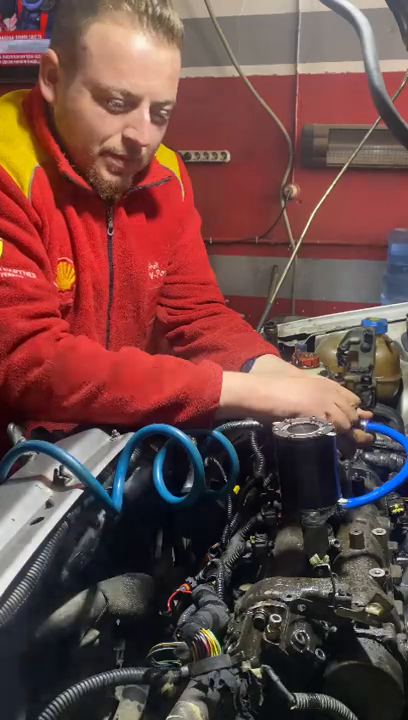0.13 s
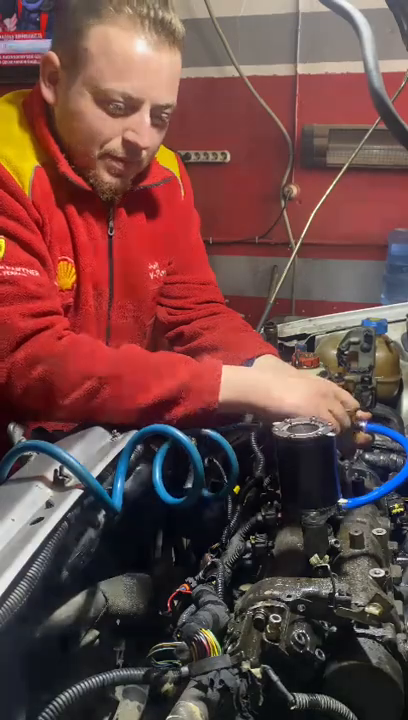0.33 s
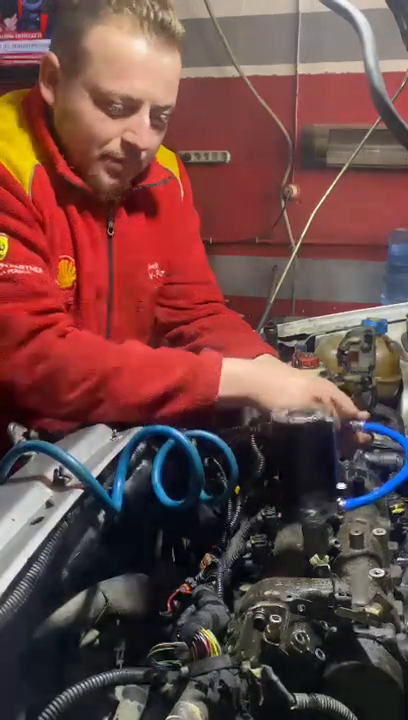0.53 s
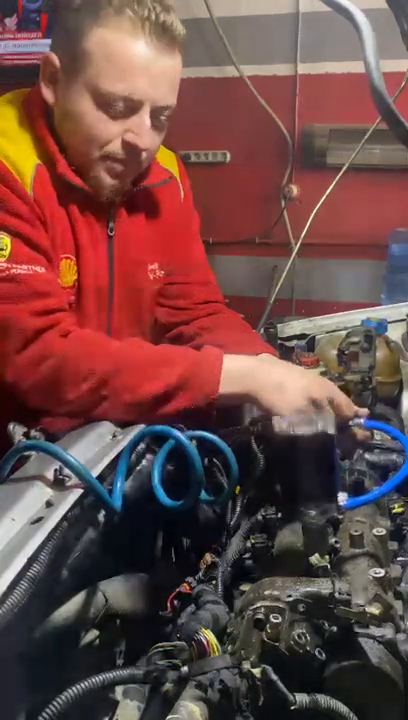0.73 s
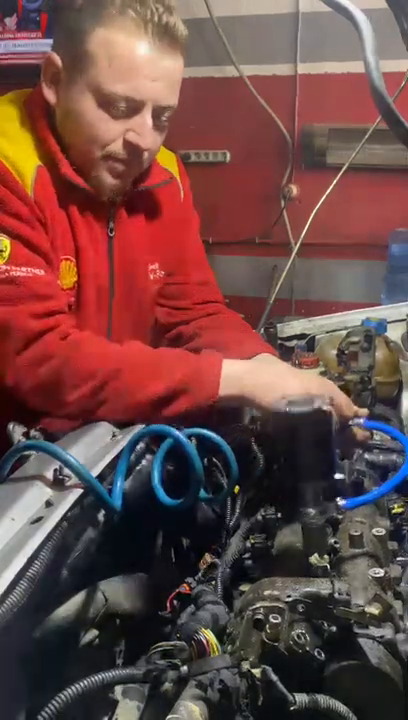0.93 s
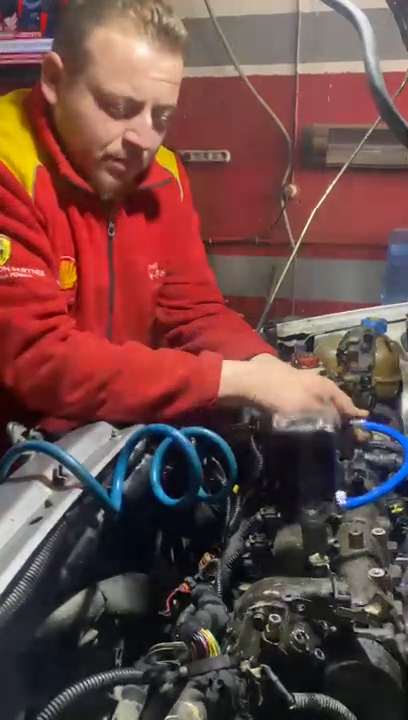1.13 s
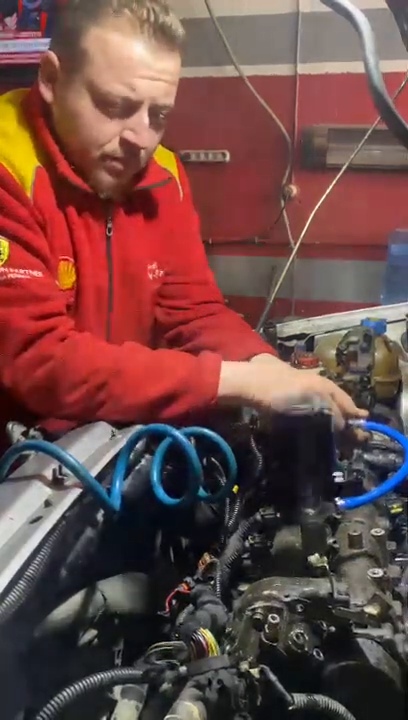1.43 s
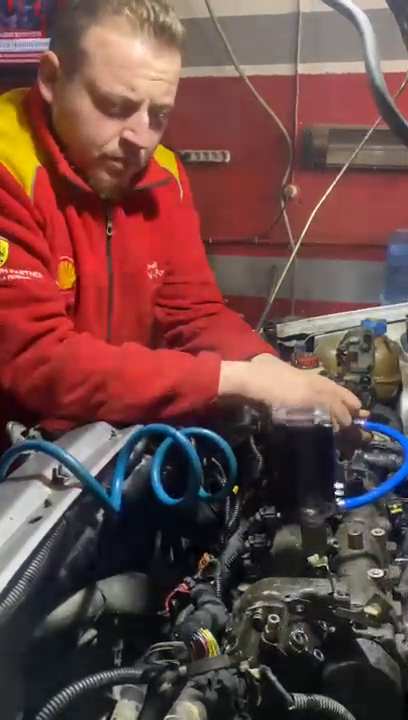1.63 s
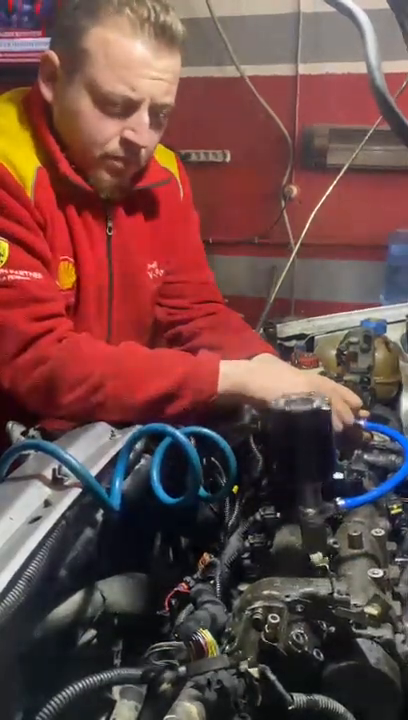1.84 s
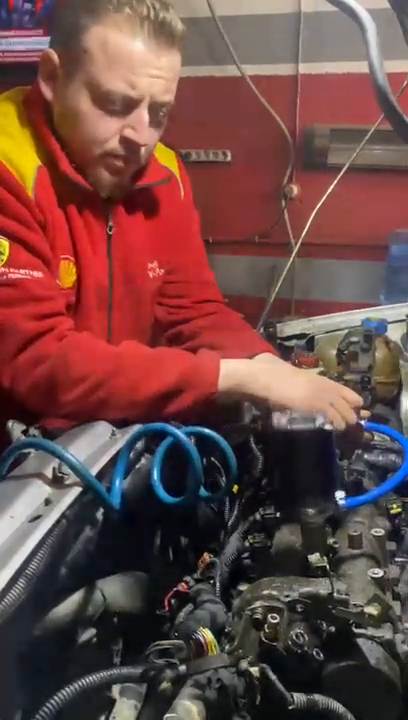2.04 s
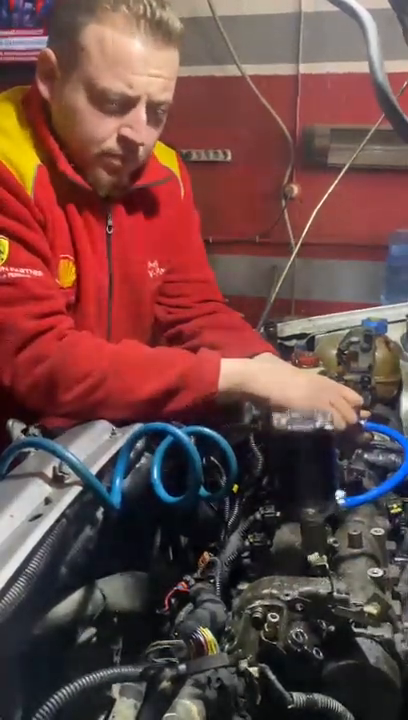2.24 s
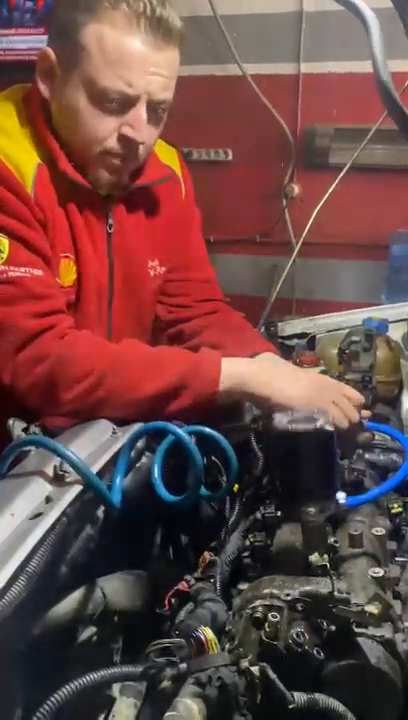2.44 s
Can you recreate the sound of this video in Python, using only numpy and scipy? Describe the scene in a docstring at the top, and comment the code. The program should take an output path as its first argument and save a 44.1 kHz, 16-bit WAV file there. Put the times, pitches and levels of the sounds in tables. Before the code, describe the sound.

Air hisses, then an air hammer pounds fast on engine metal in a workshop.

```python
"""Air hisses over a low motor hum as a valve opens, then a hand-held pneumatic hammer rattles on an engine.
The piston shuttles about 16 times a second: a bright steel strike going down, a duller knock coming back.
Exhaust air keeps hissing and puffs with each stroke.
The workshop walls answer the blows with a short reverberation."""
import sys
import numpy as np
from scipy import signal
from scipy.fft import rfft, irfft
from scipy.io import wavfile
from scipy.ndimage import uniform_filter1d

SR = 44100
rng = np.random.default_rng(int(sys.argv[2]) if len(sys.argv) > 2 else 0)


def to_wav(s):
    """Save 16-bit WAV."""
    ch = np.atleast_2d(s).T  # columns
    pcm = np.round(np.clip(ch, -1, 1) * 32767)  # PCM
    wavfile.write(sys.argv[1], SR, pcm.astype(np.int16))


N = 114660

# Motor hum. Each row: frequency in Hz, relative level in dB.
HUM_LINES = [(53, -44.5), (70, -37.5), (111, -40.5)]
# Envelopes. Each row: time in seconds, gain in dB.
BACKGROUND_GAIN = [(.6, -1), (.78, -13.5)]
DULL_RUMBLE_GAIN = [(.12, -41.5), (.55, -47)]
VALVE_GAIN = [(.17, -80), (.215, -37.5), (.275, -24.5), (.33, -27.5), (.47, -29.5), (.52, -20.5),
              (.57, -15), (.595, -21.5), (.9, -40), (2.6, -40.5)]
EXHAUST_GAIN = [(.17, -78), (.23, -46), (.58, -43.5), (.68, -20), (.8, -26), (1.4, -27), (2.6, -29)]
# Noise spectra. Each row: frequency in Hz, relative density in dB.
RUMBLE_SPECTRUM = [(20, -13), (55, -9.5), (400, -17.5), (3000, -31), (10000, -51.5)]
ROOM_SPECTRUM = [(1000, 2), (10000, 0.5)]
VALVE_SPECTRUM = [(300, -48), (1600, -19), (2200, 1), (2650, -16), (3200, -0.5), (5000, 4), (10800, 9)]
EXHAUST_SPECTRUM = [(45, -18), (125, 4.5), (220, -7), (350, 2.5), (550, -2), (1200, 0), (2000, -1.5),
                    (3600, -0.5), (5300, -3.5), (9000, -2), (12000, -7.5)]
KNOCK_SPECTRUM = [(60, -19), (170, 21.5), (700, -17), (2300, 4.5), (5500, -2), (12000, -1.5)]
CRACK_SPECTRUM = [(100, -20), (330, -10.5), (650, 4.5), (1000, 2), (3600, -1.5), (5000, 6.5), (6200, -3),
                  (12000, -20)]
TICK_SPECTRUM = [(4000, -9), (7000, 10), (9200, 1), (12000, -6.5)]
THUD_SPECTRUM = [(70, -23.5), (150, -2), (350, 3.5), (9000, -79)]
# Resonances of the valve passages, the steel tip, and tool plus engine. Each entry: frequency in Hz.
PASSAGE_MODES_HZ = [3200, 4220, 5300, 6750, 8750, 9750, 10750, 11550]
TIP_MODES_HZ = [8450, 9480]
STEEL_MODES_HZ = [290, 362, 412, 680, 910, 1059, 1218, 1331, 1573, 1715, 1830, 2255, 2520, 3130, 4100, 4400,
                  4950, 5200]
# Ring per steel mode. Each row: T60 in seconds, gain on a strike in dB, gain on a return in dB.
STEEL_RING = [(0.14, -20, -29), (0.17, -19.5, -16.5), (0.16, -27.5, -18.5), (0.0095, -1, -2.5),
              (0.16, -22.5, -29), (0.052, -13.5, -2), (0.21, -25.5, -16.5), (.091, -18.5, -9.5),
              (0.1, -19, -37), (0.046, -17.5, -1), (0.037, -16.5, -18.5), (0.069, -18.5, -11.5),
              (0.043, -21, -11.5), (0.017, -6, 0), (0.019, -5.5, 1), (0.012, -6.5, -16), (0.015, 4.5, -10),
              (0.021, -16, 5)]
# Return strokes. Each row: start in seconds, relative level in dB.
RETURN_STROKES = [(0.682, -4.5), (0.77, -6.5), (0.83, -11), (0.891, -8.5), (0.994, -8), (1.054, -11),
                  (1.117, -11.5), (1.192, -11), (1.384, -13), (1.423, -12), (1.484, -12.5), (1.546, -11.5),
                  (1.635, -10.5), (1.695, -11), (1.754, -10.5), (1.815, -13), (1.876, -13.5), (1.995, -11),
                  (2.054, -11), (2.116, -11), (2.176, -12.5), (2.272, -12), (2.332, -12.5), (2.394, -13),
                  (2.457, -12.5), (2.518, -14), (2.575, -12)]
# Down strokes. Each row: start in seconds, relative level in dB, contact tick level in dB.
DOWN_STROKES = [(0.641, -2.5, -17), (0.708, -0.5, -28), (0.732, -5.5, -16), (0.797, -6, -12.5),
                (0.857, -6.5, -7.5), (0.916, -3.5, -10.5), (0.953, -5.5, -15), (1.02, -4.5, -11.5),
                (1.082, -5.5, -11), (1.144, -4, -16.5), (1.169, -6.5, -11.5), (1.231, -6.5, -16.5),
                (1.258, -6, -11), (1.294, -4.5, -13.5), (1.334, -8.5, -20), (1.361, -4.5, -17),
                (1.452, -6.5, -15), (1.511, -8, -35), (1.573, -7, -15), (1.596, -8.5, -20),
                (1.661, -7.5, -6.5), (1.721, -6, -10), (1.782, -7, -10.5), (1.843, -6, -15.5),
                (1.904, -6.5, -19), (1.929, -6.5, -17), (1.955, -11.5, -24.5), (2.021, -7, -11),
                (2.081, -6, -10), (2.141, -5.5, -13.5), (2.203, -7.5, -35), (2.233, -8.5, -17),
                (2.297, -7.5, -14), (2.36, -6, -18.5), (2.422, -7, -16.5), (2.484, -7, -15),
                (2.544, -7, -14)]
# Left-right noise likeness. Each row: frequency in Hz, likeness from 0 to 1.
STEREO_LIKENESS = [(300, 1), (700, 0.11), (1900, 0.7), (2600, 0.27), (6800, 1), (11000, 0.96)]
# Left over right, before the bass taper. Each row: frequency in Hz, level in dB.
STEREO_BALANCE = [(300, -1.5), (680, -5.5), (1300, -6), (1900, 0.5), (4800, -4.5), (6000, 0)]
# Lead of the left, before the bass taper. Each row: frequency in Hz, phase in radians.
STEREO_PHASE = [(520, -1.4), (1100, 0), (1900, .1), (2800, 1), (5750, .5), (6400, 3), (8100, 3.2),
                (9400, 6.2)]

RISE_S = 0.00088  # noise attack of a blow
TIME_S = np.arange(N) / SR
BINS_HZ = np.arange(N // 2 + 1) * SR / N
LEFT_RIGHT = np.array([[1], [-1]])


def undb(db):
    """Decibels to gain."""
    return 10 ** (np.asarray(db) / 20)


def envelope(points):
    """Gain over time from (s, dB) points."""
    return undb(np.interp(TIME_S, *np.array(points).T))


def per_bin(points):
    """(Hz, value) points joined on a log-frequency axis."""
    hz, value = np.array(points).T
    return np.interp(np.log(BINS_HZ + 1), np.log(hz), value)


def colour(x, spectrum, peaks_hz=(), peak_db=8, half_width_hz=170):
    """Minimum-phase filter with optional narrow resonances; keeps the power of white noise."""
    peaks = sum(np.exp(-np.square((BINS_HZ - hz) / half_width_hz)) for hz in peaks_hz)
    gain = undb(per_bin(spectrum) + peak_db * peaks)
    cepstrum = irfft(np.log(gain / np.sqrt(np.mean(gain ** 2))), N)
    cepstrum[1:N // 2] *= 2
    cepstrum[N // 2 + 1:] = 0
    return irfft(rfft(x) * np.exp(rfft(cepstrum)), N)


def bass_taper(corner_hz=330):
    """Stereo width per bin: long waves reach both sides alike."""
    return 1 - np.exp(-(BINS_HZ / corner_hz) ** 2)


def noise():
    """Stereo white noise, partly alike, mono in the deep bass."""
    side_power = np.clip(1 - per_bin(STEREO_LIKENESS), 0, 1) * bass_taper() / 2
    mid, side = rfft(rng.standard_normal((2, N)))
    return irfft(mid * np.sqrt(1 - side_power) + LEFT_RIGHT * side * np.sqrt(side_power), N)


def waver(rate_hz):
    """Smooth random motion, unit deviation."""
    hold = int(SR / rate_hz)
    steps = np.repeat(rng.standard_normal(N // hold + 1), hold)
    smooth = uniform_filter1d(steps, hold)[:N]
    return smooth / smooth.std()


def bursts(starts_s, levels_db, rise_s, decay_s):
    """One envelope per blow: linear rise, exponential fall."""
    out, t = np.zeros(2 * N), np.arange(SR // 10) / SR
    shape = np.minimum(t / rise_s, 1) * np.exp(-np.maximum(t - rise_s, 0) / decay_s)
    for start_s, db in zip(starts_s, levels_db):
        at = int(start_s * SR)
        out[at:at + len(t)] += undb(db) * shape
    return out[:N]


def workshop(waver_db=1.4, waver_rad=.45, rumble_db=-41.5, bump_hz=416):
    """Wavering motor hum, low rumble, one soft bump and a dull rumble that sinks early on."""
    hum = np.zeros(N)
    for hz, db in HUM_LINES:
        amplitude = np.sqrt(2) * undb(db + waver_db * waver(5.3))
        hum += amplitude * np.sin(2 * np.pi * hz * TIME_S + waver_rad * waver(6.2))
    rumble = undb(rumble_db) * colour(noise(), RUMBLE_SPECTRUM)
    bump_gain = bursts(starts_s=[.094], levels_db=[-28], rise_s=0.00099, decay_s=0.018)
    bump = bump_gain * np.sin(2 * np.pi * bump_hz * TIME_S)
    dull_rumble = colour(noise(), THUD_SPECTRUM) * envelope(DULL_RUMBLE_GAIN)
    return (hum + rumble) * envelope(BACKGROUND_GAIN) + bump + dull_rumble


def room(x, t60_s=0.56, gain_db=-7, delay_s=.004):
    """Diffuse reverberation of the engine bay and walls."""
    decay = np.exp(-np.log(1000) * TIME_S / t60_s) * (TIME_S > delay_s)
    tail = colour(noise() * decay, ROOM_SPECTRUM)
    tail /= np.sqrt(np.sum(tail ** 2) / 2)
    return undb(gain_db) * signal.fftconvolve(x.mean(0)[None], tail, axes=1)[:, :N]


def valve_air(flicker_db=.5):
    """Escaping air: a thin hiss that whistles in the valve passages."""
    hiss = colour(noise(), VALVE_SPECTRUM, PASSAGE_MODES_HZ)
    return hiss * envelope(VALVE_GAIN) * undb(flicker_db * waver(90.0))


def exhaust_air(puff_db=6):
    """Broad exhaust hiss that puffs after every stroke."""
    starts_s = [row[0] for row in [*DOWN_STROKES, *RETURN_STROKES]]
    puffs = bursts(starts_s, np.zeros(len(starts_s)), rise_s=0.002, decay_s=0.005)
    return colour(noise(), EXHAUST_SPECTRUM) * envelope(EXHAUST_GAIN) * undb(puff_db * puffs)


def steel_ring(starts_s, levels_db, modes_db, gain_db=-6.5, contact_s=0.0017):
    """A short rough contact rings tool and engine, varying per blow and per side."""
    scatter_hz, scatter_rad, roughness = 13, .6, .07
    out, t = np.zeros((2, 2 * N)), np.arange(SR // 8) / SR
    hz, t60_s = np.array(STEEL_MODES_HZ)[:, None], np.array(STEEL_RING)[:, :1]
    fade = undb(modes_db)[:, None] * np.exp(-np.log(1000) * t / t60_s) * np.minimum(t / contact_s, 1)
    polarity_rad = np.pi * np.arange(len(hz))[:, None]
    for start_s, db in zip(starts_s, levels_db):
        detune, size, shift, skew = rng.standard_normal((4, len(hz), 1))
        modes = fade * np.exp(2j * np.pi * (hz + scatter_hz * detune) * t)
        stereo_rad = LEFT_RIGHT.T * skew * np.minimum(hz / 2500, .4)
        phase_rad = polarity_rad + scatter_rad * shift + stereo_rad
        weights = (1 + roughness * size) * np.exp(1j * phase_rad)
        at = int(start_s * SR)
        out[:, at:at + len(t)] += undb(db + gain_db) * (weights.T @ modes).imag
    return out[:, :N]


def piston_returns(knock_db=-15):
    """The returning piston rings the steel with a duller knock."""
    starts_s, levels_db = np.array(RETURN_STROKES).T
    ring = steel_ring(starts_s, levels_db, modes_db=np.array(STEEL_RING)[:, 2])
    knock = noise() * bursts(starts_s, levels_db + knock_db, RISE_S, decay_s=0.008)
    return ring + colour(knock, KNOCK_SPECTRUM)


def piston_strikes(crack_db=-10, thud_db=-32, first_thud_boost_db=18):
    """Down strokes ring and crack, tick at the tip and thud the engine block, the first thud hardest."""
    starts_s, levels_db, ticks_db = np.array(DOWN_STROKES).T
    thuds_db = levels_db + thud_db
    thuds_db[0] += first_thud_boost_db
    ring = steel_ring(starts_s, levels_db, modes_db=np.array(STEEL_RING)[:, 1])
    crack = noise() * bursts(starts_s, levels_db + crack_db, RISE_S, decay_s=0.0057)
    tick = noise() * bursts(starts_s, ticks_db, RISE_S, decay_s=0.0037)
    thud = noise() * bursts(starts_s, thuds_db, RISE_S, decay_s=0.018)
    return (ring + colour(crack, CRACK_SPECTRUM) + colour(tick, TICK_SPECTRUM, TIP_MODES_HZ)
            + colour(thud, THUD_SPECTRUM))


def scene():
    """Hammer, air and workshop, spread left and right by level and phase."""
    blows = piston_strikes() + piston_returns()
    mix = blows + room(blows) + valve_air() + exhaust_air() + workshop()
    side = LEFT_RIGHT / 2 * bass_taper()
    balance = undb(side * per_bin(STEREO_BALANCE))
    phase_rad = side * per_bin(STEREO_PHASE)
    return irfft(rfft(mix, N) * balance * np.exp(1j * phase_rad), N)


def record(dry):
    """Brief opening silence, rounded peaks, steep treble cut."""
    start_s, fade_s, ceiling, cutoff_hz = 0.082, 0.00091, .9, 11700
    fade_in = np.clip((TIME_S - start_s) / fade_s, 0, 1)
    rounded = ceiling * np.tanh(dry * fade_in / ceiling)
    return signal.sosfilt(signal.ellip(12, .2, 80, cutoff_hz, fs=SR, output="sos"), rounded)


dry = scene()
out = record(dry)
to_wav(out)
```